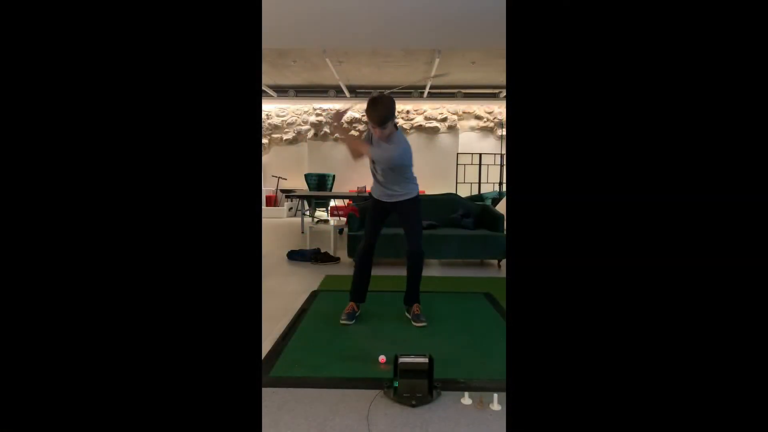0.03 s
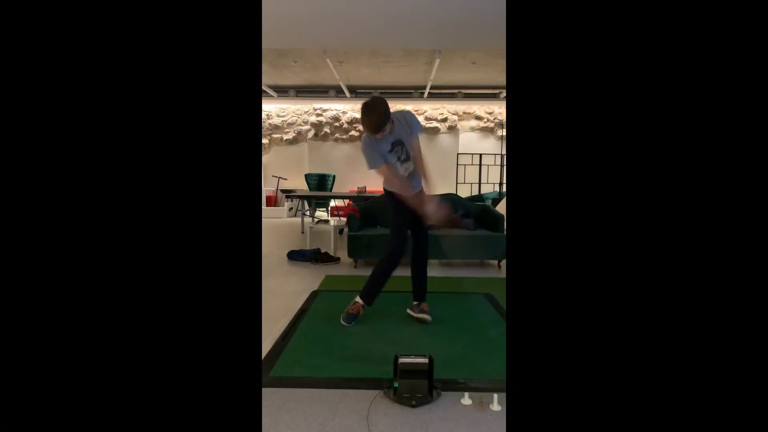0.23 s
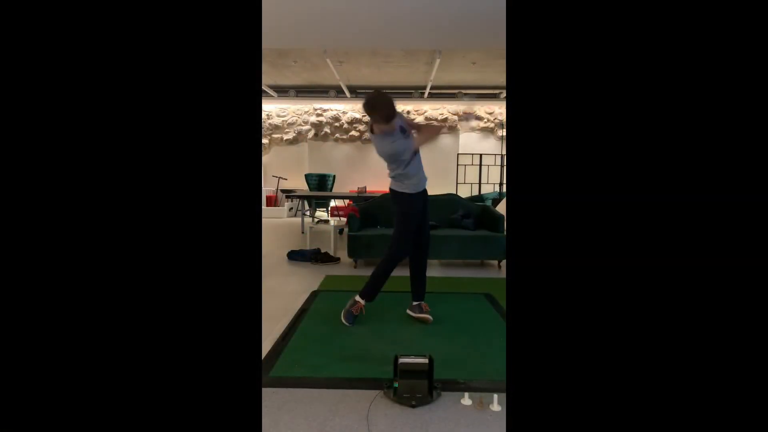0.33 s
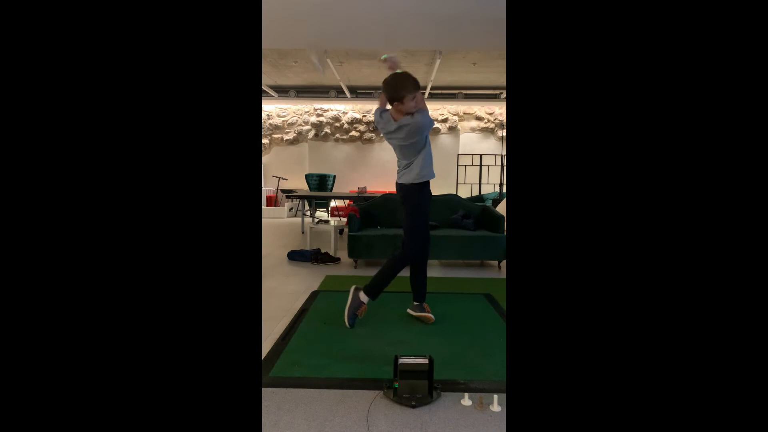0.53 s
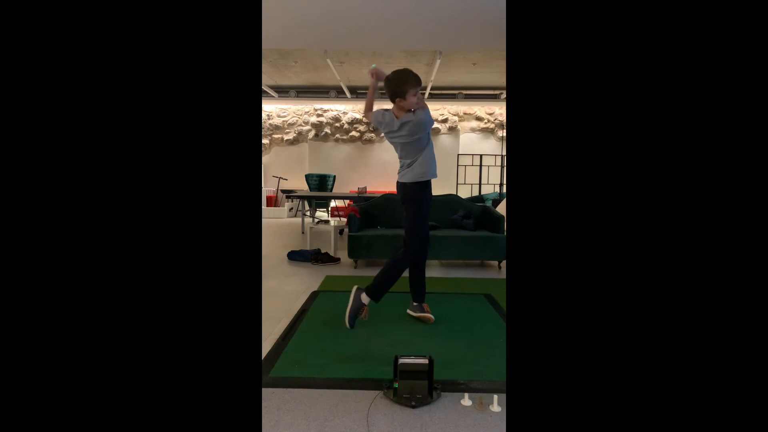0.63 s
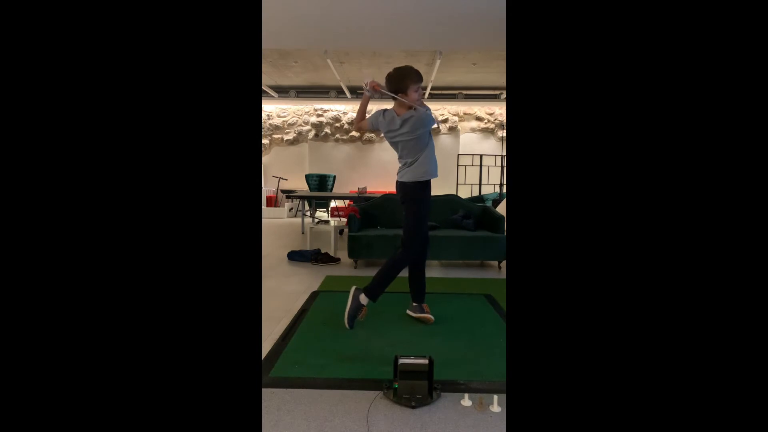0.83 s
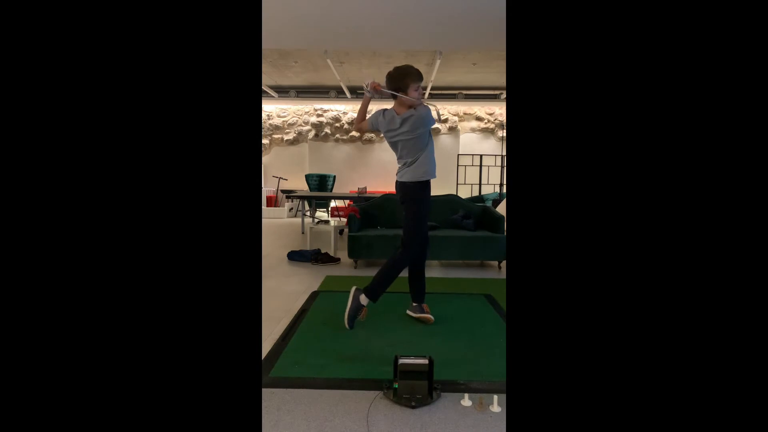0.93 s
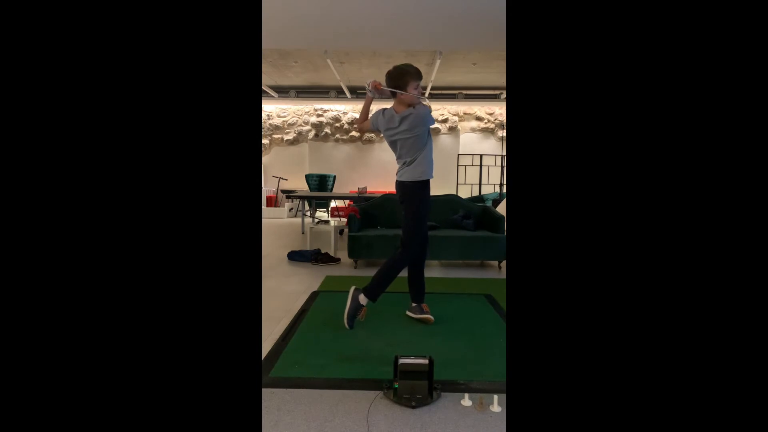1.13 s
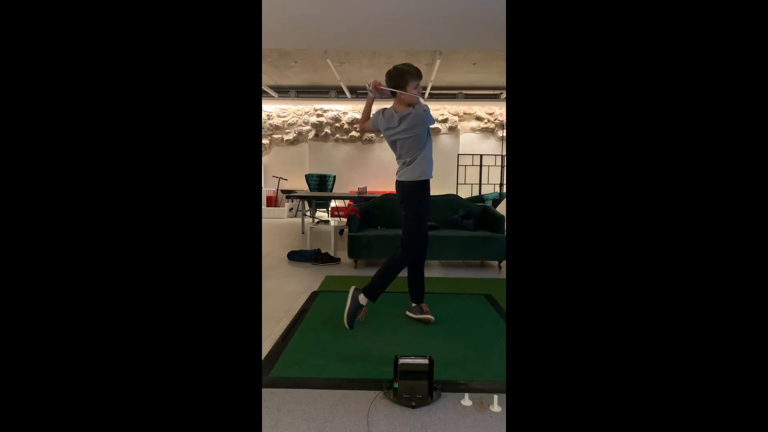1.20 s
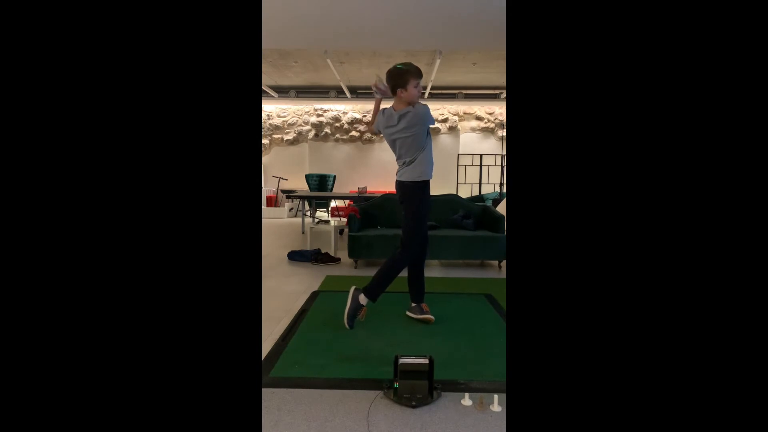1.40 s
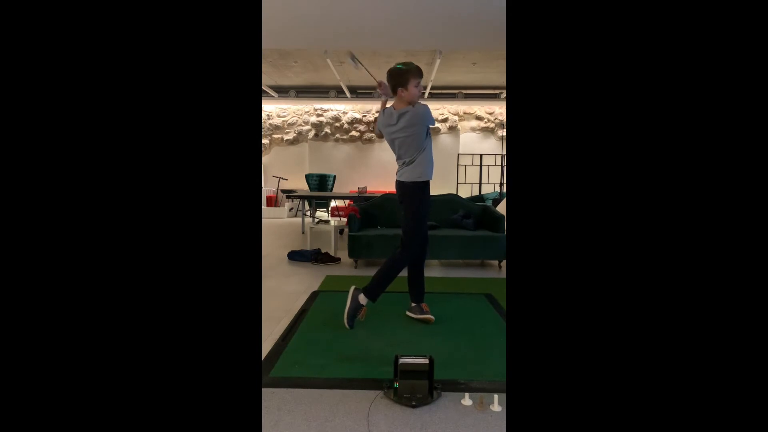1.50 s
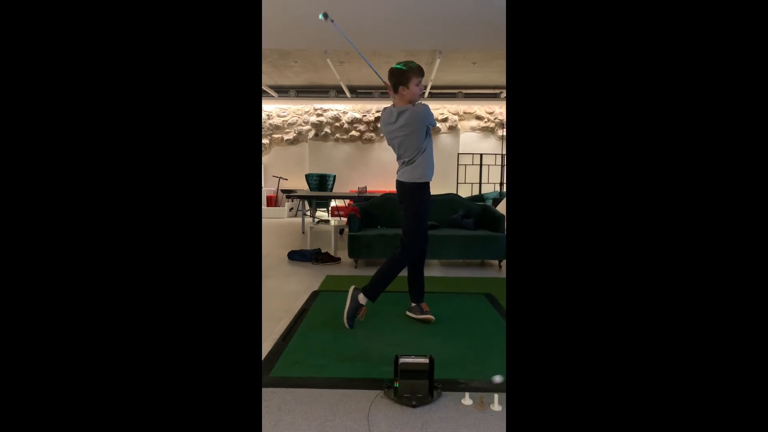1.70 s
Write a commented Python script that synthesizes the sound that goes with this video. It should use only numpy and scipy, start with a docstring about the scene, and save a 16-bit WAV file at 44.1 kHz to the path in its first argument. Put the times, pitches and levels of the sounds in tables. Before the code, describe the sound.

Golf shot in a hard, echoing basement: short swish, sharp crack, deep net thump, small bounces

```python
"""A low, hard basement: a golf club swishes down and cracks a ball off a mat, the ball slaps into a hanging net,
then drops and bounces on the floor. The swish is noise with a gliding whistle, the contacts are coloured noise
bursts and damped sines, and the net's boom sets the room's low modes ringing. Reverberant noise answers the blows.
A ventilation rumble lies under it, and one dry click stands without echo. Two spaced microphone ports pick up
the room."""
import sys
import numpy as np
from scipy import signal
from scipy.fft import rfft, irfft, next_fast_len
from scipy.io import wavfile
from scipy.ndimage import uniform_filter1d, map_coordinates

SR = 44100
rng = np.random.default_rng(int(sys.argv[2]) if len(sys.argv) > 2 else 0)


def inscribe(sig):
    """Save sig as 16-bit PCM at rate SR to the path in sys.argv[1].

    A 1-D sig is mono; a 2-D sig holds one channel per row.
    Samples are clipped to [-1, 1] before scaling.
    """
    pcm = np.round(np.clip(np.atleast_2d(sig).T, -1, 1) * 32767)
    wavfile.write(sys.argv[1], SR, pcm.astype(np.int16))


N = 77175

# Colour of the hard contacts at club and net: hz, level_db
CRACK_COLOUR = [(300, -21.5), (1000, -14), (2400, 0), (3400, -8.5), (4600, 4), (5900, -14), (7200, -3),
                (11000, 2), (16000, -1)]


def amp(db):
    """Turn decibels into gain."""
    return 10 ** (np.asarray(db) / 20)


def along(points, hz):
    """Read a curve of (Hz, value) points on a logarithmic pitch axis."""
    point_hz, value = np.transpose(points)
    return np.interp(np.log(hz + 1), np.log(point_hz + 1), value)


def filtered(x, response):
    """Shape x by a complex response of frequency, with room for delays."""
    m = next_fast_len(N + SR // 2)
    return irfft(rfft(x, m) * response(np.fft.rfftfreq(m, 1 / SR)), m)[..., :N]


def since(s):
    """Seconds after s, zero before."""
    return np.clip(np.arange(N) / SR - s, 0, None)


def diffuse(spectrum):
    """Stereo noise of rms 1 from all around: the ports' likeness varies with pitch."""
    # Correlation between left and right: hz, likeness (-1 to 1)
    likeness = [(60, 0.65), (120, 0.45), (200, 1), (380, 0.12), (700, -0.37), (1300, 0.19), (2400, -0.11)]
    top_hz = 15800

    def mid_side(hz):
        turn = np.arccos(np.clip(along(likeness, hz), -1, 1)) / 2
        return amp(along(spectrum, hz)) * (hz < top_hz) * [np.cos(turn), np.sin(turn)]

    mid, side = filtered(rng.standard_normal((2, N)), mid_side)
    pair = np.array([mid + side, mid - side])
    return pair / np.sqrt(np.mean(pair ** 2))


def reverb(s, db, spectrum, rise_s, tilt_db=0):
    """The room's answer to a blow: diffuse noise in which each frequency dies at its own speed."""
    # Decay of the room: hz, t60_s
    decay = [(60, 1), (250, 0.91), (1000, 0.8), (3000, 0.56), (8000, 0.4), (16000, 0.42)]
    ragged_db, ragged_hz = 2.5, 39.85  # the room favours some pitches: depth and spacing
    patchy_db = 2.5  # the tail fades unevenly
    lumpy_db, lumps_per_s, smooth_s = 3, 500, .08  # early echoes arrive in clumps, later they merge

    knots = rng.standard_normal(SR // 20)

    def colour(hz):
        ragged = ragged_db * map_coordinates(knots, [hz / ragged_hz])
        return amp(ragged + tilt_db * np.log2(hz / 500 + 1))

    hz, t, z = signal.stft(filtered(diffuse(spectrum), colour), SR, nperseg=512)
    patches = uniform_filter1d(rng.standard_normal(z.shape[1:]), size=3, axis=0)
    patches = uniform_filter1d(patches, size=7, axis=1)
    fade_db = 60 * np.clip(t - s, 0, None) / along(decay, hz)[:, None]
    faded = z * amp(patchy_db * patches / patches.std() - fade_db)
    tail = signal.istft(faded, SR, nperseg=512)[1][:, :N]

    lumps = map_coordinates(rng.standard_normal(N // 20), [np.arange(N) * lumps_per_s / SR])
    level = amp(db + lumpy_db * lumps * np.exp(-since(s) / smooth_s))
    return level * tail * (1 - np.exp(-since(s) / rise_s))


def ring(s, modes, attack_s):
    """Damped sines from time s, as of a body struck once."""
    t = since(s)
    tones = sum(amp(db - 60 * t / t60_s) * np.sin(2 * np.pi * hz * t) for hz, db, t60_s in modes)
    return tones * (1 - np.exp(-t / attack_s))


def crack(s, db, t60_s, tone, tilt_db=0, attack_s=.0001):
    """A short noise burst, evened out over pitch and then coloured."""
    t = since(s)
    shape = amp(db - 60 * t / t60_s) * (1 - np.exp(-t / attack_s))
    z = rfft(shape * rng.standard_normal(N))
    hz = np.fft.rfftfreq(N, 1 / SR)
    evenness = np.sqrt(np.abs(uniform_filter1d(np.abs(z) ** 2, size=N // 60)) + 1e-30)
    colour = amp(along(tone, hz) + tilt_db * np.log2(hz / 1000 + 1))
    noise = irfft(z / evenness * colour, N) * (t > 0)
    return noise * np.linalg.norm(shape) / np.linalg.norm(noise)  # colouring keeps the energy


def burst(s, hz, db, cycles, edge, sag_s):
    """A few cycles of a sinking tone; a small edge gives a square envelope."""
    turns = hz * sag_s * (1 - np.exp(-since(s) / sag_s))
    envelope = np.abs(np.sin(np.pi * np.clip(turns / cycles, 0, 1))) ** edge
    return amp(db) * np.sin(2 * np.pi * turns) * envelope


def ports(x, lag_ms):
    """A direct sound from one side reaches one port first; it is louder on the right."""
    turn_rad, turn_hz = 0.95, 1200  # phase turn between the ports above the bass
    right_db = 2.5

    def left_right(hz):
        turn = np.sign(lag_ms) * turn_rad / 2 * hz ** 2 / (hz ** 2 + turn_hz ** 2)
        half_phase = np.pi * hz * lag_ms / 1000 + turn
        return np.exp(1j * np.outer([-1, 1], half_phase))  # a positive lag delays the left

    return filtered(x, left_right) * amp([[-right_db / 2], [right_db / 2]])


def ventilation():
    """Steady, bass-heavy diffuse noise of the ventilation."""
    # Colour of the rumble: hz, relative_level_db (per Hz)
    rumble = [(20, -31.5), (40, 0.5), (70, -2), (200, -2), (400, -22.5), (550, -35), (900, -36.5),
              (2200, -51.5), (6000, -62), (16000, -62.5)]
    return amp(-58) * diffuse(rumble)


def tick():
    """A dry click: a quick swell that drops away at once, without echo."""
    end_s, level_db, rise_s = .6233, -27, 0.0032
    t = np.arange(N) / SR - end_s
    return amp(level_db) * np.exp(np.clip(t, None, 0) / rise_s) * (t < 0)


def swish():
    """Air rushes and whistles round the shaft, dying away from just before the strike."""
    # Course of the swing: time_s, level_db, whistle_hz
    swing = [(.06, -73.5, 299.7), (.1, -74, 377.2), (.145, -59, 479.3), (.168, -47, 604), (.18, -40.5, 670),
             (0.187, -48, 580), (.198, -41.5, 453)]
    # Colour of the rushing air: hz, relative_level_db (per Hz)
    air = [(120, -38), (200, -11), (620, -6.5), (850, -13.5), (1900, -21.5), (4000, -30.5), (8000, -44),
           (15500, -39.5)]
    whistle_db = -1.5  # the shaft sings over the rush

    s, db, hz = np.transpose(swing)
    t = np.arange(N) / SR
    after_s = since(s[-1])
    phase = 2 * np.pi * np.cumsum(np.interp(t, s, hz)) / SR
    whistle = amp(whistle_db - 60 * after_s / .02) * np.sin(phase)
    level = amp(np.interp(t, s, db, left=-120) - 60 * after_s / .15)
    return level * (diffuse(air) + whistle)


def bounces():
    """Each floor contact clicks, thuds and wakes the room; near walls repeat the louder clicks."""
    # The ball on the floor: start_s, click_db, left_lag_ms, click_tilt_db (per octave),
    # thud_db, room_db, room_tilt_db (per octave), hollow_db
    contacts = [(.712, -58, 0.065, 2, -62, -50, 0, -2), (0.7724, -31.5, -0.29, 7.5, -32.5, -40, 3, -4.5),
                (1.203, -38.5, -0.183, 2, -34, -45, -1.5, 4.5),
                (1.391, -63, -0.18, 2, -35.5, -49.5, -5.5, 11.5),
                (1.607, -81, -0.18, 3, -35.5, -45.5, -10.5, -2)]
    # Clicks back from near walls: start_s, level_db, left_lag_ms, tilt_db (per octave)
    wall_echoes = [(0.783, -32, -0.6, 1.5), (0.793, -33, 0.22, -1), (1.2145, -46, -0.57, 2),
                   (1.224, -50, 0.39, 0)]
    # Colour of the click: hz, level_db
    click_colour = [(500, -5), (1500, 17), (2500, 10), (3200, 2), (3850, 3), (5500, -12.5), (7000, -8),
                    (16000, -17.5)]
    # Tones of the struck floor, relative to thud_db: hz, level_db, t60_s
    floor_modes = [(294.5, 2.5, 0.033), (372, -13, 0.061)]
    # Colour of the room's answer: hz, relative_level_db (per Hz)
    room_colour = [(25, -6.5), (65, 2), (200, -5), (400, -6.5), (640, -20.5), (1400, -24), (2800, -34.5),
                   (4300, -34.5), (5500, -47), (7000, -40.5), (15600, -55)]
    # Some spots of floor lose one band and favour the next: hz, share (of hollow_db)
    hollow = [(2100, -0.1), (3000, -0.71), (4000, 0.8), (5500, 0.29)]
    click_rise_s, echo_rise_s = 0.00031, 0.0008

    total = np.zeros((2, N))
    for s, db, lag_ms, tilt_db in wall_echoes:
        total += ports(crack(s, db, 0.011, click_colour, tilt_db, echo_rise_s), lag_ms)
    for s, click_db, lag_ms, tilt_db, thud_db, room_db, room_tilt_db, hollow_db in contacts:
        click = crack(s, click_db, 0.0079, click_colour, tilt_db, click_rise_s)
        thud = amp(thud_db) * ring(s, floor_modes, 0.0039)
        room = reverb(s, room_db, room_colour, 0.0076, room_tilt_db)
        contact = ports(click + thud, lag_ms) + room
        total += filtered(contact, lambda hz: amp(hollow_db * along(hollow, hz)))
    return total


def net():
    """The ball slaps the net: mesh rustle, a deep sagging boom and the room modes that it starts."""
    # Colour of the shaking mesh: hz, level_db
    rustle_colour = [(500, -22.5), (900, 15), (1300, 7.5), (2500, -13.5), (5000, -18), (16000, -29)]
    # Knock tones: hz, level_db, t60_s
    knock_modes = [(440.5, -11, 0.048), (188, -9.5, 0.021)]
    # Low room modes: hz, level_db, t60_s
    room_modes = [(50.68, -15, 1), (69.4, -20, 0.79), (78.36, -15.5, 0.73), (108.1, -18, 0.78),
                  (135.8, -38, 0.94), (180.5, -26.5, 0.66), (254.2, -32.5, 0.35), (391.6, -29.5, 0.88),
                  (423, -30.5, 0.94)]
    # Colour of the room's answer: hz, relative_level_db (per Hz)
    room_colour = [(25, -31), (50, -17), (110, -4.5), (220, -17), (420, -18), (750, -24.5), (1300, -36),
                   (2500, -41), (5500, -52.5), (7000, -51), (15600, -54)]
    slap_s, rustle_s = .2797, .284  # ball meets the net, mesh shakes
    boom_s, modes_s = .2884, .2955  # the sheet gives way, the far walls have answered
    rustle_db = -21
    far_wall_s, far_wall_db = .031, -6  # slap, knock and rustle come back once

    slap = burst(slap_s, hz=595, db=-9.5, cycles=2.7, edge=.5, sag_s=0.018)
    snap = crack(slap_s - .001, -9, 0.004, CRACK_COLOUR, attack_s=0.0012)
    rustle = crack(rustle_s, rustle_db, 0.13, rustle_colour, attack_s=0.0036)
    knock = ring(rustle_s, knock_modes, 0.0013)
    # the pitch sinks as the sheet slackens
    boom = burst(boom_s, hz=158.4, db=-4.5, cycles=1.9, edge=0.9, sag_s=0.019)
    low = boom + knock + ring(modes_s, room_modes, 0.02)
    far_rustle = crack(rustle_s, rustle_db, 0.088, rustle_colour, attack_s=0.0016)
    far = amp(far_wall_db) * np.roll(slap + knock + far_rustle, round(far_wall_s * SR))
    room = reverb(boom_s, -17.5, room_colour, 0.012)
    return slap + ports(snap + rustle, 0.54) + ports(far, -0.48) + low + room


def strike():
    """The sole brushes and thumps the mat, the club face cracks on the ball, the room answers."""
    # The strike and its first strong wall echoes:
    # start_s, level_db, t60_s, rise_ms, left_lag_ms, tilt_db (per octave)
    cracks = [(0.2015, -2.5, 0.0039, .3, 0.33, -1), (0.207, -19.5, 0.0053, 0.7, -1.4, 0.5),
              (.2132, -12, 0.009, 1, -0.2, -7.5), (0.2212, -23, 0.0055, 0.87, 1, -3),
              (.2345, -22, .006, .6, 0.43, -4.5)]
    # Thump of club on mat: hz, level_db, t60_s
    mat_modes = [(328, -15.5, 0.044), (176, -32.5, 0.097), (1100, -29.5, .02)]
    # Colour of the sole brushing the mat: hz, level_db
    scuff_colour = [(1500, -24.5), (3300, 2.5), (5500, -0.5), (7500, -18.5), (16000, -30.5)]
    # Colour of the room's answer: hz, relative_level_db (per Hz)
    room_colour = [(25, -34.5), (50, -4), (170, -3), (400, -9), (800, -17.5), (1100, -11), (2500, -16.5),
                   (5500, -25.5), (7000, -22), (15600, -25.5)]

    scuff = crack(.188, -46, .1, scuff_colour, attack_s=0.0013)
    thump = ring(.2048, mat_modes, .002)
    total = ports(scuff + thump, 0.13)
    for s, db, t60_s, rise_ms, lag_ms, tilt_db in cracks:
        total += ports(crack(s, db, t60_s, CRACK_COLOUR, tilt_db, rise_ms / 1000), lag_ms)
    return total + reverb(cracks[0][0], -26, room_colour, .004)


def scene():
    """All acoustic sources over the rumble."""
    return ventilation() + swish() + bounces() + net() + strike()


def record(dry):
    """Both ports below the blend, one port spread by a delay above it; the dry click; a band limit."""
    one_port_hz, blend_hz = 6250, 500  # the treble comes from the right port alone
    spread_s = .000213  # treble delay of left behind right
    low_cut_hz, mono_hz = 31, 151  # the microphone gives out, the ports agree
    top_hz = 16600

    def share(hz):
        return np.pi / 2 / (1 + np.exp(np.clip((one_port_hz - hz) / blend_hz, -50, 50)))

    def spread(hz):
        return np.exp(1j * np.pi * spread_s * np.outer([-1, 1], hz - one_port_hz))

    two_ports = filtered(dry, lambda hz: np.cos(share(hz)))
    one_port = filtered(dry[1], lambda hz: np.sin(share(hz)) * spread(hz))
    left, right = two_ports + one_port
    cuts_hz = np.array([[low_cut_hz], [mono_hz]])  # for the mid, for the side
    mid_side = np.array([left + right, left - right]) / 2
    mid, side = filtered(mid_side, lambda hz: hz ** 4 / (hz ** 4 + cuts_hz ** 4))
    stereo = np.array([mid + side, mid - side]) + tick()
    return filtered(stereo, lambda hz: 1 / (1 + (hz / top_hz) ** 200))


dry = scene()
out = record(dry)
inscribe(out)
```